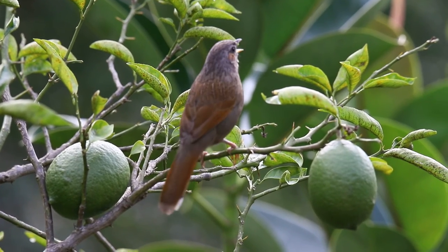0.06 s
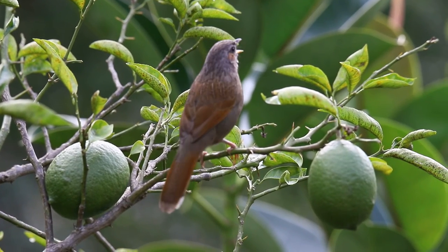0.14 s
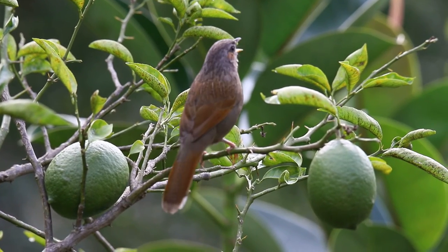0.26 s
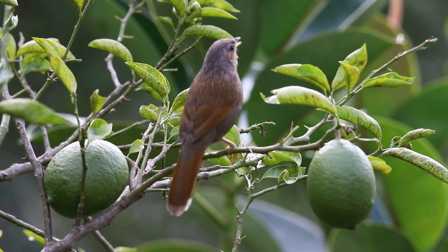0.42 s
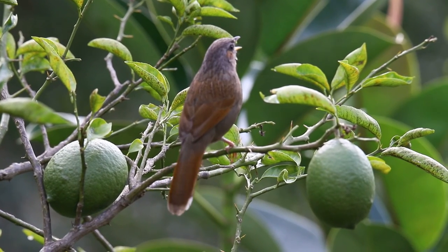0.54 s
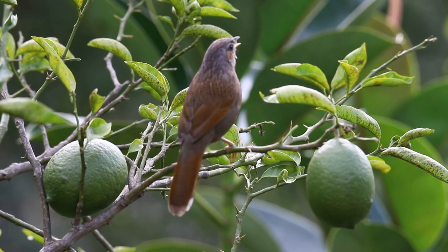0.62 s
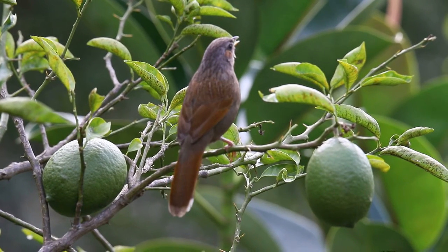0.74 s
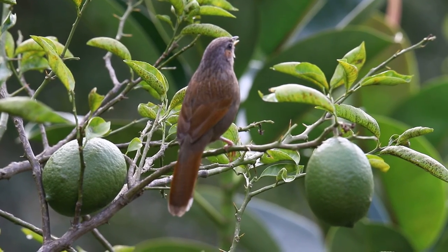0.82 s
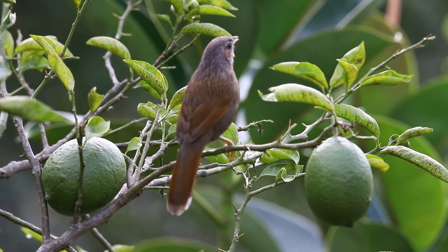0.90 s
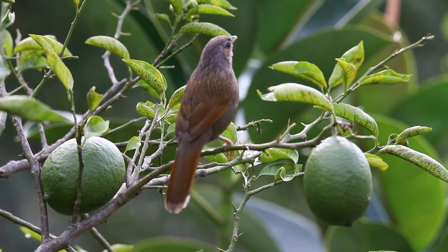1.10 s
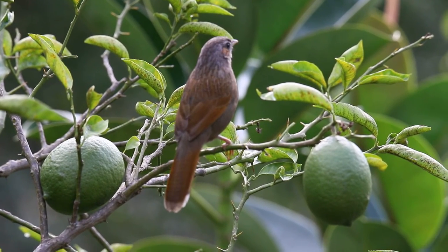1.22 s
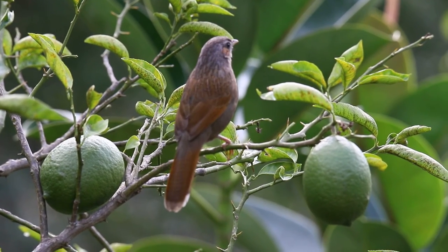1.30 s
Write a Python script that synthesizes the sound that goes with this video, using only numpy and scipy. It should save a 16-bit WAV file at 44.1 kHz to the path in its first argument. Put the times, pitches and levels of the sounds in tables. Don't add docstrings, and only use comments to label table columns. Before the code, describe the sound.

One small bird sings close by in a garden: three soft rising notes, quick up-down chirps, a high hook, then a loud falling swoop into a long downward whistle, with short leafy echoes over faint distant traffic.

```python
import sys
import numpy as np
from scipy import signal
from scipy.fft import rfft, irfft, next_fast_len
from scipy.io import wavfile
from scipy.ndimage import uniform_filter1d, map_coordinates

SR = 44100
rng = np.random.default_rng(int(sys.argv[2]) if len(sys.argv) > 2 else 0)


def undo_db(level):
    steps = np.asarray(level, float) / 20
    return 10 ** steps


def output_pcm(signal):
    pcm = np.clip(np.atleast_2d(signal).T, -1, 1) * 32767
    wavfile.write(sys.argv[1], SR, np.round(pcm).astype(np.int16))


N = 59535


def unit(x):
    return x / np.sqrt(np.mean(x ** 2) + 1e-20)


def along(points, hz):
    point_hz, value = np.transpose(points)
    return np.interp(np.log(hz + 1), np.log(point_hz + 1), value)


def wobble(rate):
    knots = rng.standard_normal(int(N * rate / SR) + 4)
    return map_coordinates(knots, [np.arange(N) * rate / SR])


def filtered(x, response):
    size = next_fast_len(N + 8192)
    return irfft(rfft(x, size) * response(np.fft.rfftfreq(size, 1 / SR)), size)[..., :N]


def fade(t, start, end):
    return np.sin(np.pi / 2 * np.clip(np.minimum(t - start, end - t) / .005, 0, 1)) ** 2


# (harmonic number, level under the fundamental [dB])
UPPER_HARMONICS = [(3, -64), (4, -54), (5, -49), (6, -51)]
QUIVER = 0.0042
FLUTTER_DB, OVERTONE_FLUTTER_DB = 1.5, 3.5
BEAK_OPENS_S, CLOSED_BEAK_DB = .66, -20


def syrinx(hz, db, overtone_db, gate, throat=((3000, 0),)):
    hz = hz * (1 + QUIVER * wobble(150))
    phase = 2 * np.pi * np.cumsum(hz) / SR
    beak_db = CLOSED_BEAK_DB * np.clip((BEAK_OPENS_S - np.arange(N) / SR) / .02, 0, 1)
    overtones = [(2, overtone_db)] + [(k, level + beak_db) for k, level in UPPER_HARMONICS]
    partials = [(1, 0)] + [(k, level + OVERTONE_FLUTTER_DB * wobble(120)) for k, level in overtones]
    tone = 0
    for k, level in partials:
        audible = k * hz < SR / 2
        tone = tone + undo_db(level + along(throat, k * hz)) * np.sin(k * phase) * audible
    return np.sqrt(2) * undo_db(db + FLUTTER_DB * wobble(61.54)) * gate * tone


# (frequency [Hz], gain [dB])
THROAT = [(1800, -16.5), (2400, -10), (3000, -3), (3900, 8.5), (4600, 2), (5500, -6.5), (7000, -2.5),
          (9000, -27.5)]
LOW_HZ = 1950
RISE_BEND = 1.5
SWELL_DB = 8


def short_notes(rows, end_hz, overtone_db, fall_bend):
    t, out = np.arange(N) / SR, 0
    for start, rise, fall, top_hz, db in rows:
        up = 1 - np.clip(1 - (t - start) / rise, 0, 1) ** RISE_BEND
        down = np.clip(1 - (t - start - rise) / fall, 0, 1) ** fall_bend
        hz = LOW_HZ + (top_hz - LOW_HZ) * up - (top_hz - end_hz) * (1 - down)
        hz = uniform_filter1d(hz, round(.004 * SR))
        gate = fade(t, start, start + rise + fall)
        out = out + syrinx(hz, db + SWELL_DB * (up - 1), overtone_db, gate, THROAT)
    return out


def long_note(rows):
    t = np.arange(N) / SR
    s, *columns = np.transpose(rows)
    hz, db, overtone_db = [uniform_filter1d(np.interp(t, s, c), size=130) for c in columns]
    return syrinx(hz, db, overtone_db, fade(t, s[0], s[-1]))


# (time [s], pitch [Hz], level [dB], overtone [dB])
OPENING = [
    (.017, 2150, -50, -11),
    (.024, 2257, -40.5, -8),
    (.036, 2225, -41.5, -9),
    (.044, 2160, -51, -8),
]


def opening_note():
    return long_note(OPENING)


# (start [s], rise [s], fall [s], top pitch [Hz], level [dB])
SOFT_NOTES = [
    (.069, .010, .025, 2880, -35),
    (.129, .012, .026, 3190, -37),
]


def soft_notes():
    return short_notes(SOFT_NOTES, end_hz=2300, overtone_db=-10, fall_bend=.8)


# (start [s], rise [s], fall [s], top pitch [Hz], level [dB])
FIRST_CHIRP = [
    (.187, 0.021, .021, 4484, -32.5),
]
CHIRPS = [
    (.252, .017, .027, 5390, -31),
    (.320, .018, .027, 5530, -31),
]


def chirps():
    first = short_notes(FIRST_CHIRP, LOW_HZ, overtone_db=-18, fall_bend=1.2)
    return first + short_notes(CHIRPS, end_hz=2285, overtone_db=-18, fall_bend=2.1)


# (time [s], pitch [Hz], level [dB], overtone [dB])
HOOK = [
    (.391, 1550, -62, -30.5),
    (.397, 3313, -34.5, -49),
    (.402, 5780, -44.5, -51),
    (.407, 6220, -44.5, -51),
    (.418, 5100, -39, -45.5),
    (.427, 4360, -20.5, -45),
    (.438, 3736, -27, -32),
    (.447, 1950, -43.5, -29.5),
]


def hook():
    return long_note(HOOK)


# (time [s], pitch [Hz], level [dB], overtone [dB])
SWOOP = [
    (.473, 2300, -71.5, -21.5),
    (.481, 5650, -37, -48.5),
    (.487, 6090, -51, -45.5),
    (.512, 3868, -23, -46.5),
    (.527, 3305, -22.5, -53.5),
    (.548, 2806, -21, -37.5),
    (.573, 2557, -22, -37.5),
    (.59, 2395, -45.5, -12.5),
    (.615, 2350, -33, -3.5),
]
WHISTLE = [
    (.615, 2330, -47, -10),
    (.623, 2490, -42.5, -25),
    (.63, 3150, -22, -39.5),
    (.662, 3705, -17.5, -45.5),
    (.686, 3790, -25, -33),
    (.722, 3186, -18.5, -43.5),
    (.755, 3091, -22.5, -51),
]
GLIDE = [
    (.755, 3090, -24, -46),
    (.845, 2590, -24, -47),
    (.862, 2500, -31, -40),
    (.91, 2260, -32, -27),
    (.96, 1950, -41, -17),
    (.97, 1880, -43, -4),
    (.985, 1760, -43, -1),
    (1.0, 1550, -48, 3),
    (1.01, 1520, -56, 3),
]


def swoop_and_whistle():
    return long_note(SWOOP + WHISTLE[1:] + GLIDE[1:])


# (time [s], level [dB])
RASP = [
    (0.57, -78.5),
    (.585, -48.5),
    (.615, -51),
    (.635, -88.5),
]
# (frequency [Hz], density [dB per Hz])
RASP_COLOUR = [(3000, -57), (4500, 0), (6000, 0.5), (8000, -9.5), (13000, -29.5), (15700, -35.5)]


def rasp():
    s, db = np.transpose(RASP)
    air = unit(filtered(rng.standard_normal(N), lambda hz: undo_db(along(RASP_COLOUR, hz))))
    return air * undo_db(np.interp(np.arange(N) / SR, s, db, left=-120, right=-120))


def bird():
    return opening_note() + soft_notes() + chirps() + hook() + swoop_and_whistle() + rasp()


# (delay left [s], delay right [s], level left [dB], level right [dB])
ECHOES = [(.0020, .0021, -13, -12), (.0044, .0046, -13, -14), (.0078, .0084, -13, -15),
          (.0101, .0100, -13, -15), (.0121, .0124, -7, -7.5), (.0147, .0149, -17, -12),
          (.0195, .0200, -14, -14), (.0224, .0219, -16, -15), (.0300, .0320, -16, -16)]
# (frequency [Hz], time to fall 60 dB [s])
GARDEN_DECAY = [(1500, 0.35), (3500, .4), (8000, 0.54)]
GARDEN_DB, GARDEN_DELAY_S, BIRD_PAN_DB = -6, .008, 0.8


def garden(x):
    def near(hz):
        response = 1
        for left_s, right_s, left_db, right_db in ECHOES:
            delay = np.array([[left_s], [right_s]])
            response = response + undo_db([[left_db], [right_db]]) * np.exp(-2j * np.pi * hz * delay)
        return response

    hz, t, z = signal.stft(rng.standard_normal((2, SR // 2)), SR, nperseg=256)
    decay = undo_db(-60 * t / along(GARDEN_DECAY, hz)[:, None])
    tail = signal.istft(z * decay, SR, nperseg=256)[1]
    late = np.pad(x, (round(GARDEN_DELAY_S * SR), 0))[None]
    scattered = signal.fftconvolve(late, tail / np.linalg.norm(tail[0]), axes=1)[:, :N]
    return filtered(x, near) * undo_db([[BIRD_PAN_DB], [-BIRD_PAN_DB]]) + undo_db(GARDEN_DB) * scattered


# (start [s], length [s], pitch [Hz], level [dB], pan [dB])
FAR_CALLS = [(.005, .16, 4020, -57, 0), (.004, .018, 7420, -67, 0), (.023, .015, 7420, -63, 0),
             (.04, .016, 7420, -63, 0), (.40, .075, 7420, -69, 0), (.7, .06, 7420, -71, 0),
             (.903, .021, 6920, -48, 0), (.906, .045, 6400, -65, 0), (.926, .026, 6940, -63, 0),
             (.82, .06, 4600, -63, 0), (.2, .24, 740, -58, 0)]


def far_calls():
    t, out = np.arange(N) / SR, 0
    for start, length, hz, db, pan_db in FAR_CALLS:
        drift = np.array([wobble(40), wobble(40)])
        level = undo_db(db + 1.8 * wobble(46) + np.array([[pan_db], [-pan_db]]))
        tone = np.sin(2 * np.pi * hz * t + 0.43 * drift) * level
        out = out + np.sqrt(2) * tone * fade(t, start, start + length)
    return out


# (frequency [Hz], density [dB per Hz])
TRAFFIC = [(30, -34.5), (44, -6.5), (80, -3), (190, -8.5), (300, -5), (450, -11), (1200, -15), (15600, -49)]
# (frequency [Hz], gain [dB])
AIR = [(1200, 0.5), (2400, 4.5), (5100, 8.5), (9000, 6), (15600, -4)]
# (frequency [Hz], left-right likeness [-1 to 1])
ALIKE = [(50, .99), (300, 0.92), (600, 0.78), (1200, .15), (4000, 0.16), (12000, 0.16)]
# (frequency [Hz], left minus right [dB])
TRAFFIC_PAN = [(100, 0.9), (500, 1), (1200, -2.8), (5000, 0)]
TRAFFIC_DB = -42


def traffic():
    z = signal.stft(rng.standard_normal((2, N + 512)), nperseg=512)[2]
    patches = uniform_filter1d(rng.standard_normal(z.shape[1:]), size=6, axis=0)
    patches = uniform_filter1d(patches, size=12, axis=1)
    pair = signal.istft(z * undo_db(0.79 * unit(patches)), nperseg=512)[1][:, :N]

    def mid_side(hz):
        turn = np.arccos(np.clip(along(ALIKE, hz), -1, 1)) / 2
        return undo_db(along(TRAFFIC, hz) + along(AIR, hz)) * [np.cos(turn), np.sin(turn)]

    mid, side = filtered(pair, mid_side)
    rush = np.array([mid + side, mid - side]) / np.std(mid)
    return undo_db(TRAFFIC_DB) * filtered(rush, lambda hz: undo_db(along(TRAFFIC_PAN, hz) * [[.5], [-.5]]))


# (frequency [Hz], level [dB])
DRONE = [(47.5, -53.5), (94, -55.5), (141, -51.5)]


def motor():
    t, drone = np.arange(N) / SR, 0
    for hz, db in DRONE:
        level = undo_db(db + 1.8 * wobble(9.7)) * np.sqrt(2)
        drone = drone + level * np.sin(2 * np.pi * hz * t + 0.51 * wobble(7.4))
    return drone * undo_db([[.6], [-.6]])


def scene():
    return garden(bird()) + far_calls() + traffic() + motor()


def top_cut(x):
    return signal.sosfilt(signal.butter(12, 15760, fs=SR, output="sos"), x)


def record(dry):
    mix = filtered(dry, lambda hz: hz < 15750)
    return top_cut(mix)


dry = scene()
out = record(dry)
output_pcm(out)
```